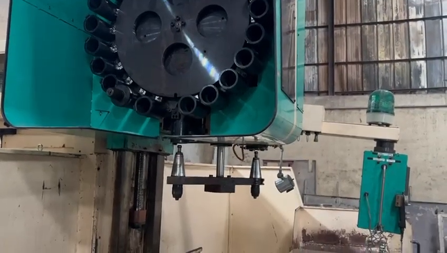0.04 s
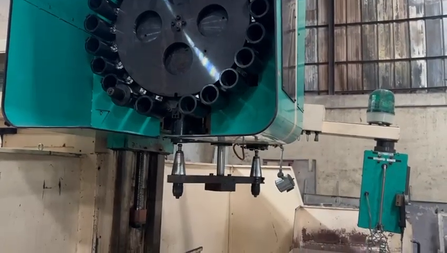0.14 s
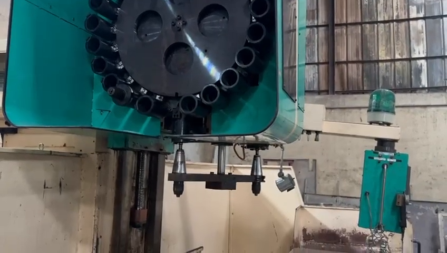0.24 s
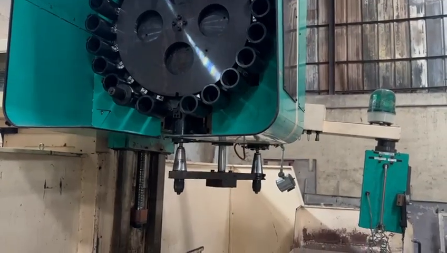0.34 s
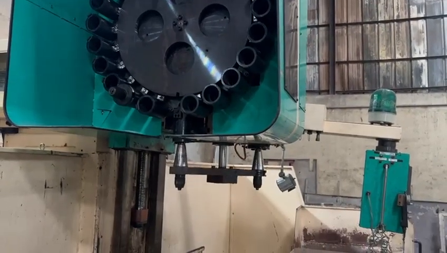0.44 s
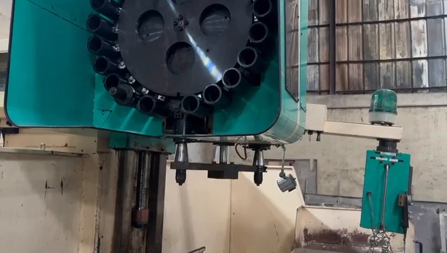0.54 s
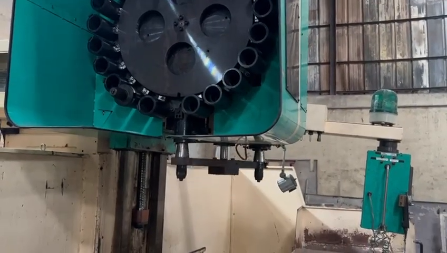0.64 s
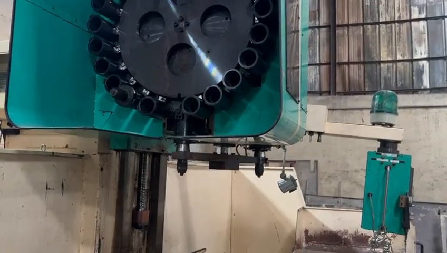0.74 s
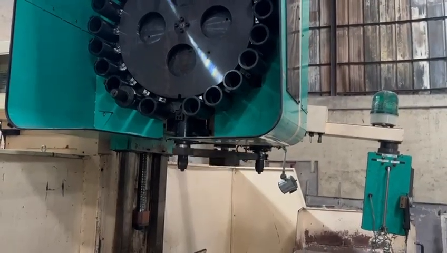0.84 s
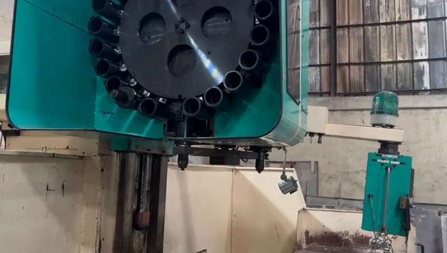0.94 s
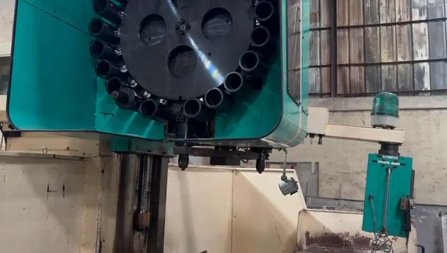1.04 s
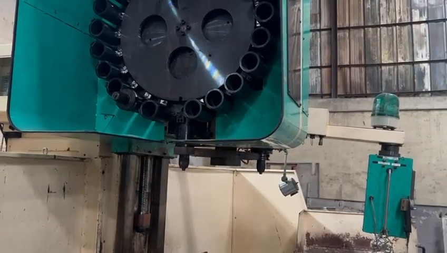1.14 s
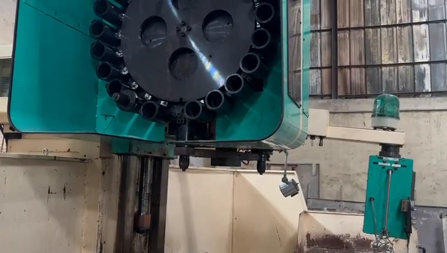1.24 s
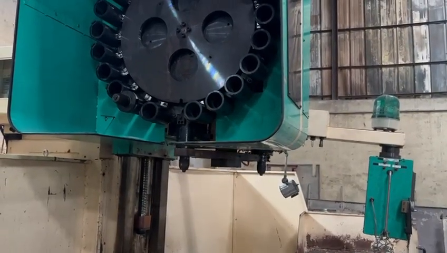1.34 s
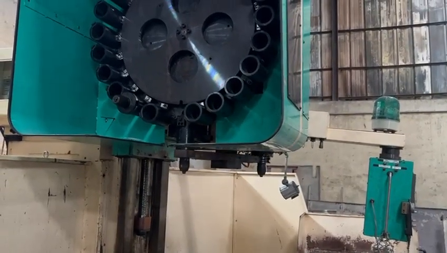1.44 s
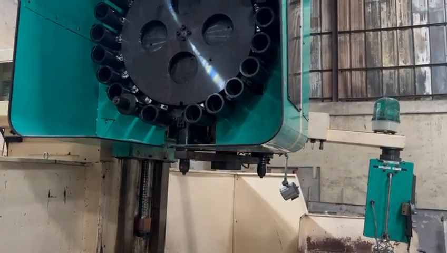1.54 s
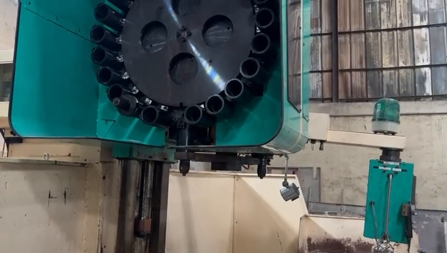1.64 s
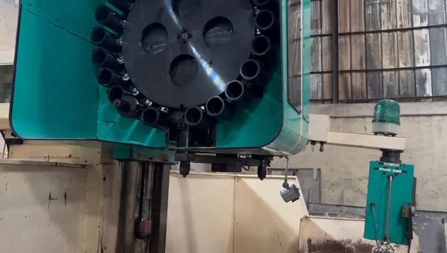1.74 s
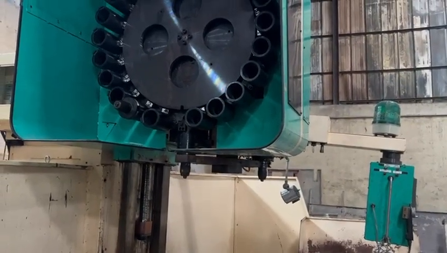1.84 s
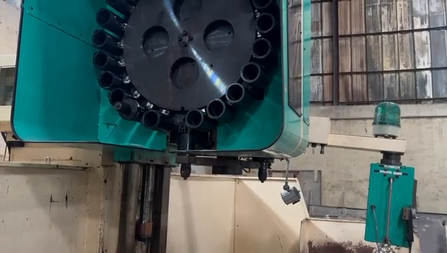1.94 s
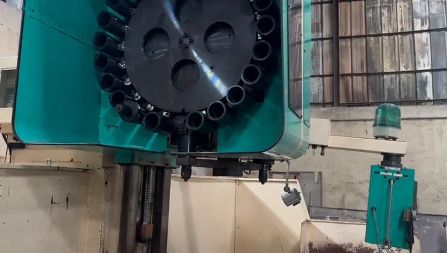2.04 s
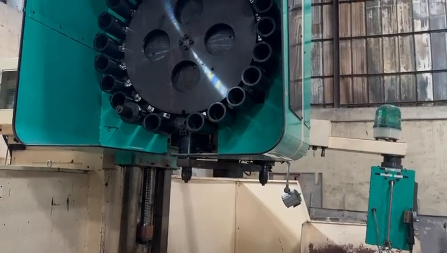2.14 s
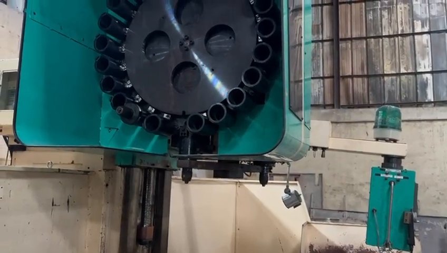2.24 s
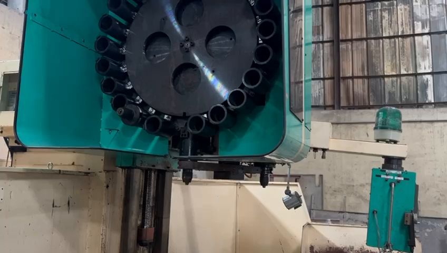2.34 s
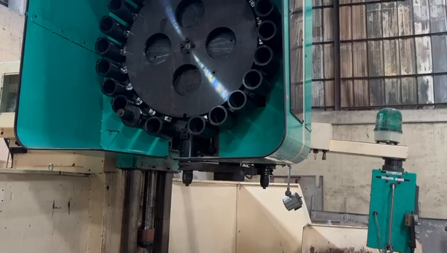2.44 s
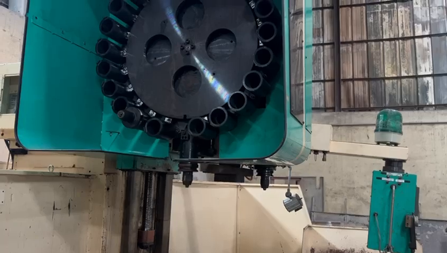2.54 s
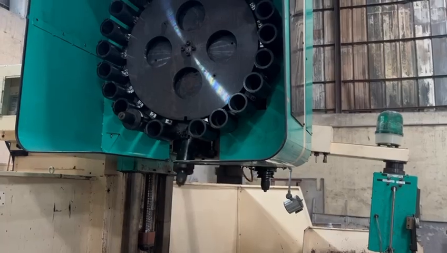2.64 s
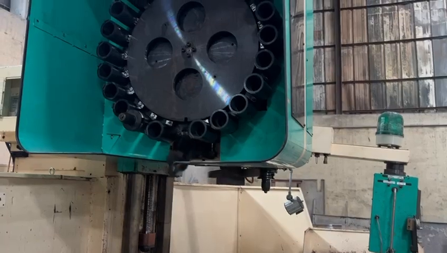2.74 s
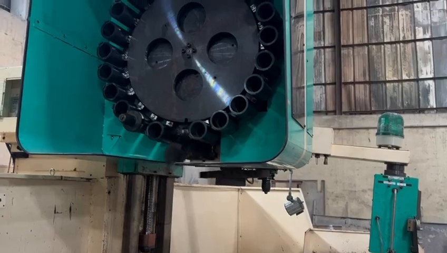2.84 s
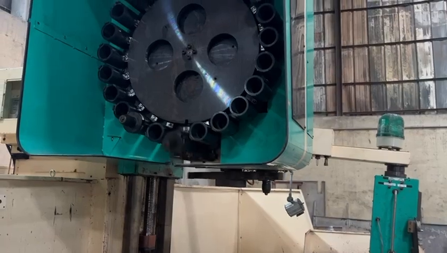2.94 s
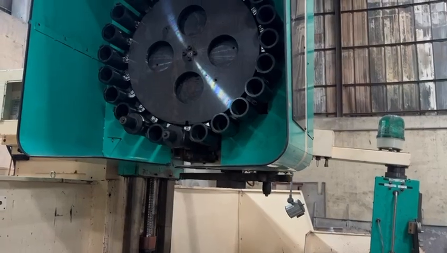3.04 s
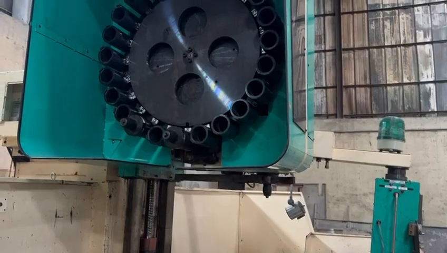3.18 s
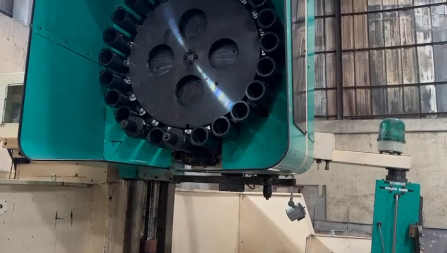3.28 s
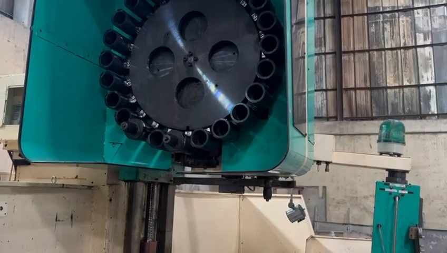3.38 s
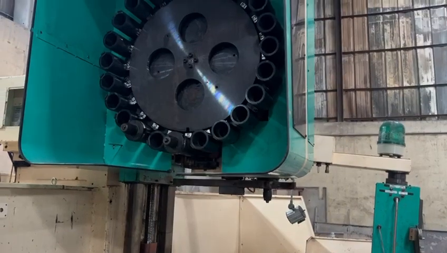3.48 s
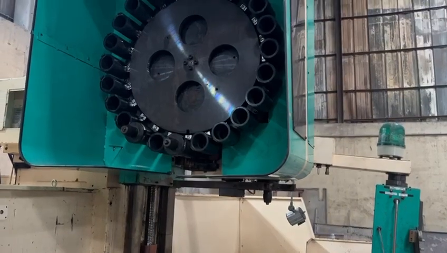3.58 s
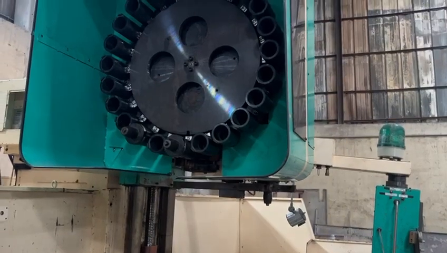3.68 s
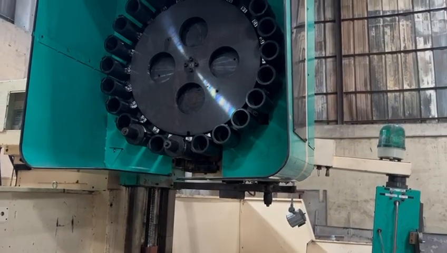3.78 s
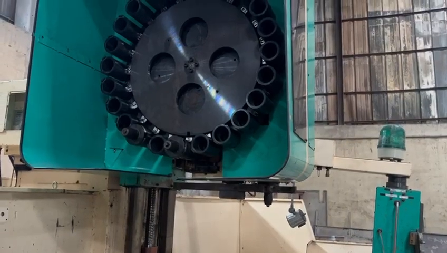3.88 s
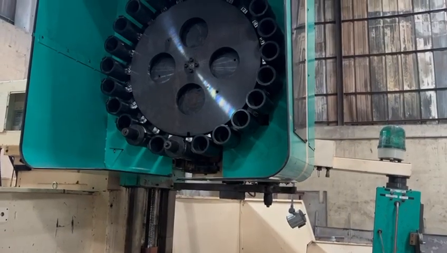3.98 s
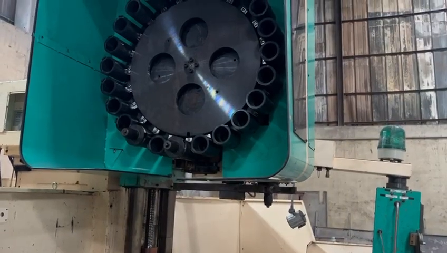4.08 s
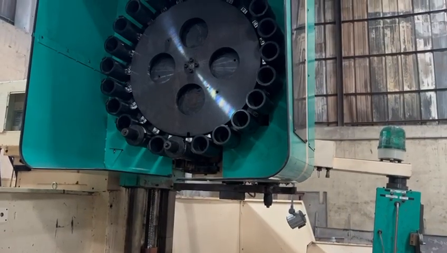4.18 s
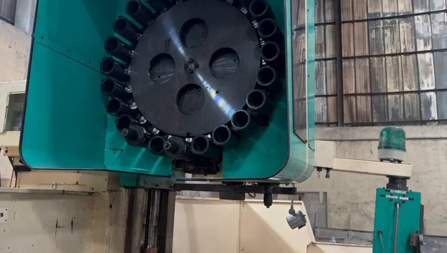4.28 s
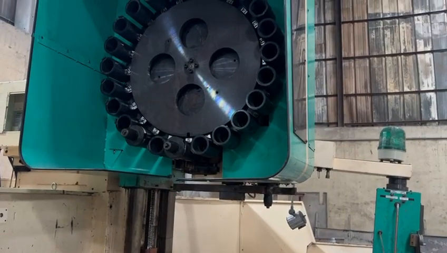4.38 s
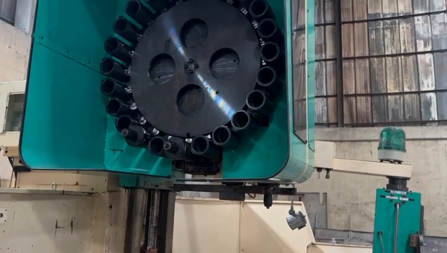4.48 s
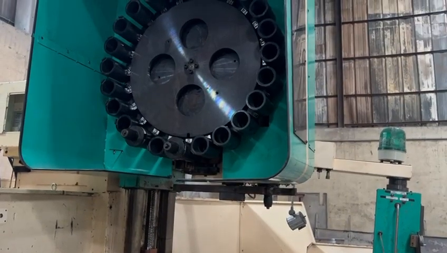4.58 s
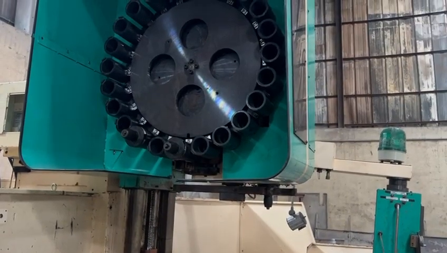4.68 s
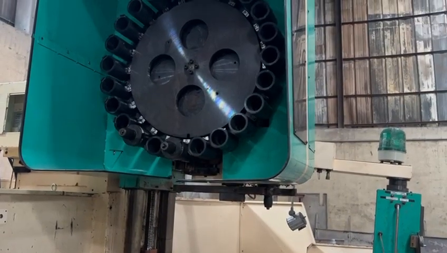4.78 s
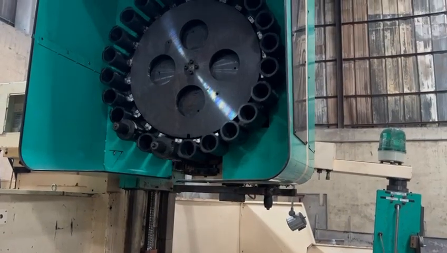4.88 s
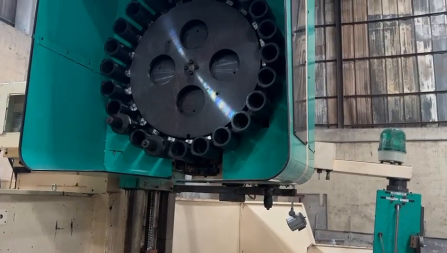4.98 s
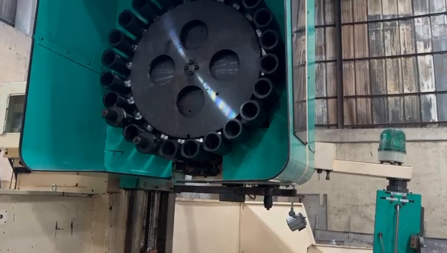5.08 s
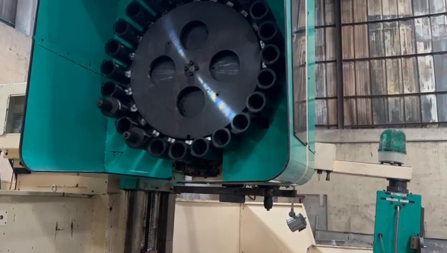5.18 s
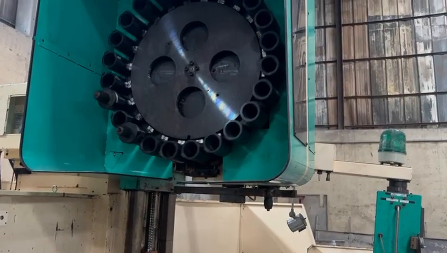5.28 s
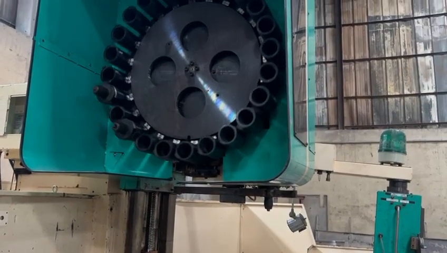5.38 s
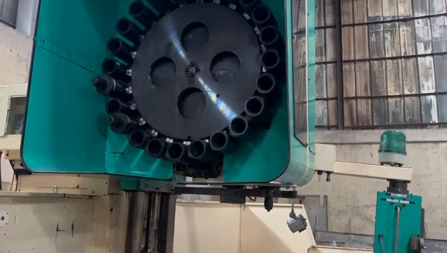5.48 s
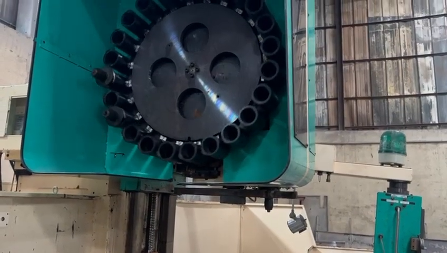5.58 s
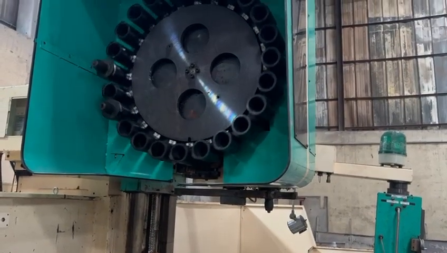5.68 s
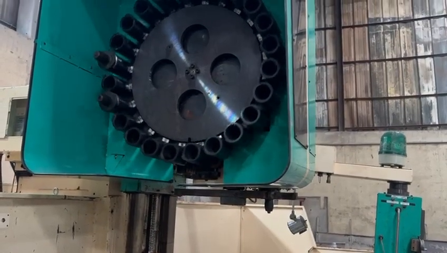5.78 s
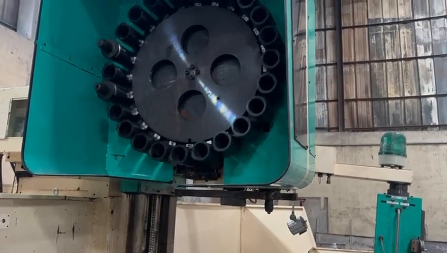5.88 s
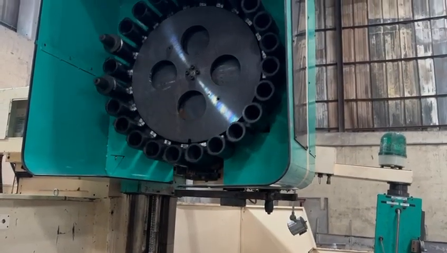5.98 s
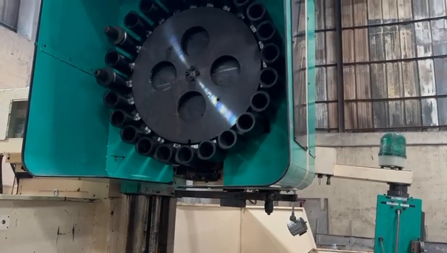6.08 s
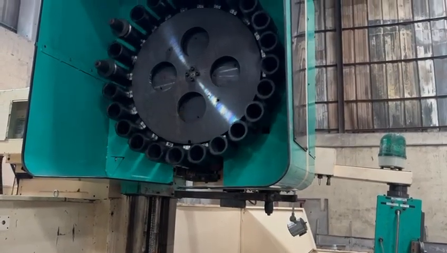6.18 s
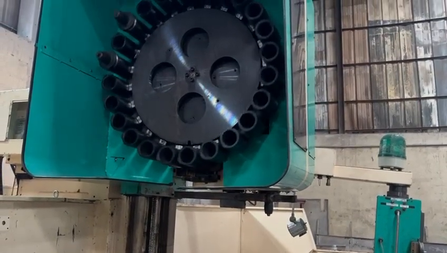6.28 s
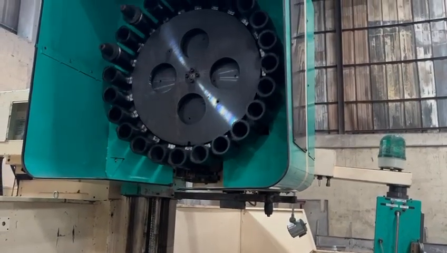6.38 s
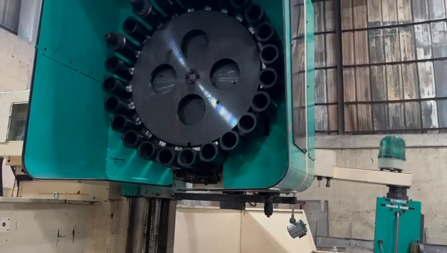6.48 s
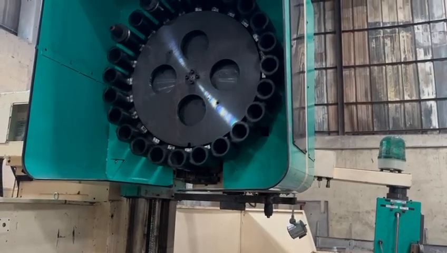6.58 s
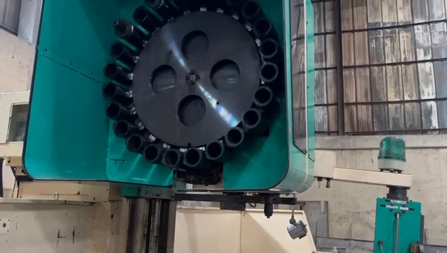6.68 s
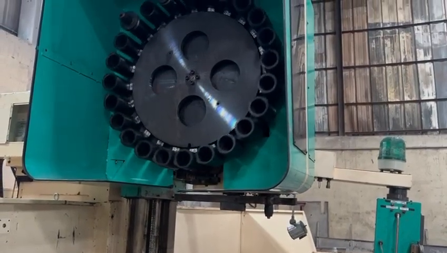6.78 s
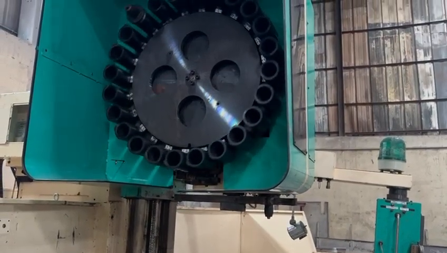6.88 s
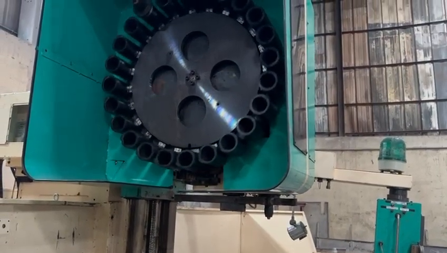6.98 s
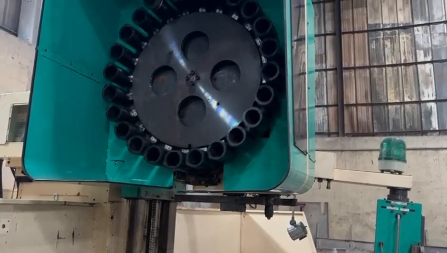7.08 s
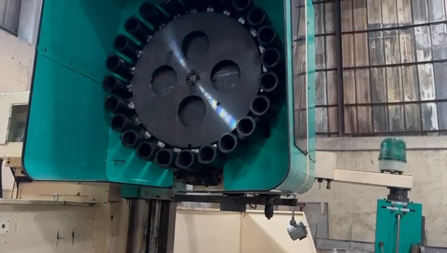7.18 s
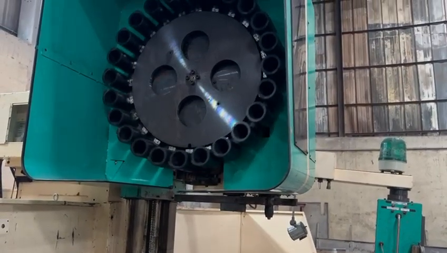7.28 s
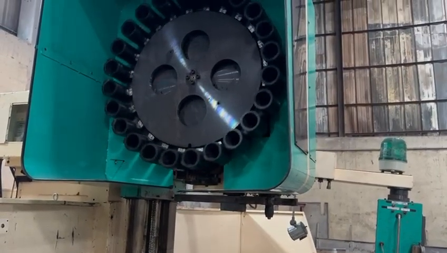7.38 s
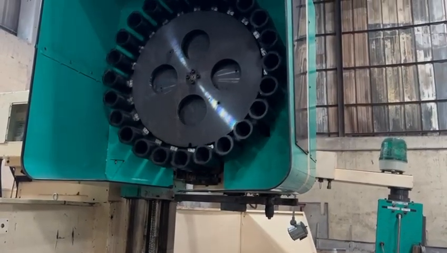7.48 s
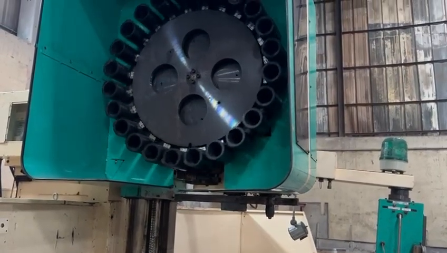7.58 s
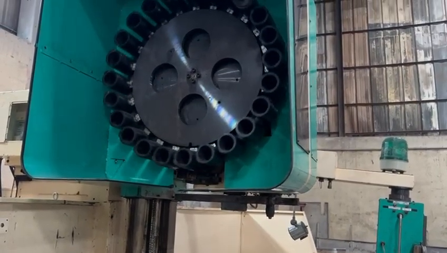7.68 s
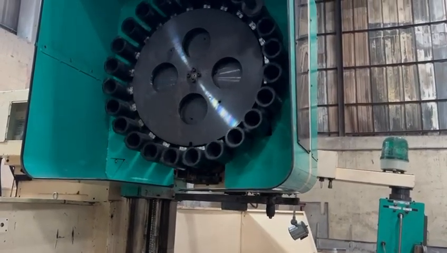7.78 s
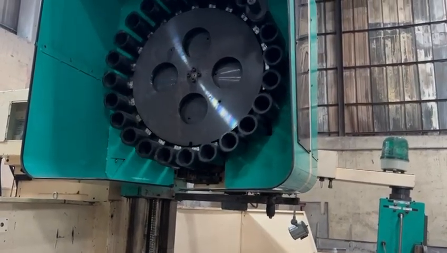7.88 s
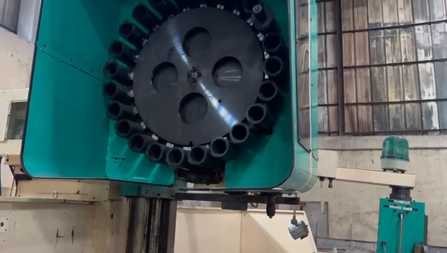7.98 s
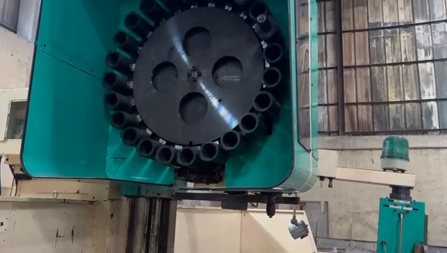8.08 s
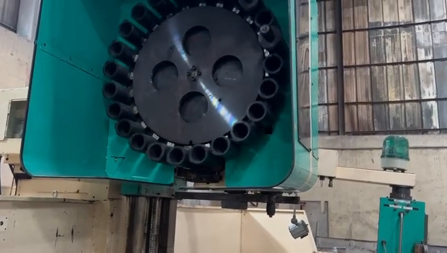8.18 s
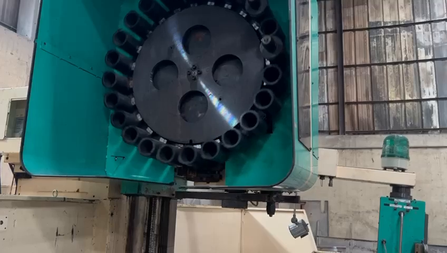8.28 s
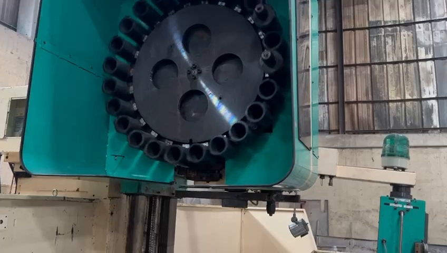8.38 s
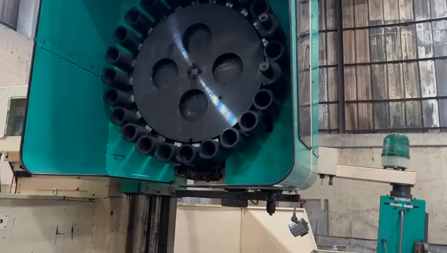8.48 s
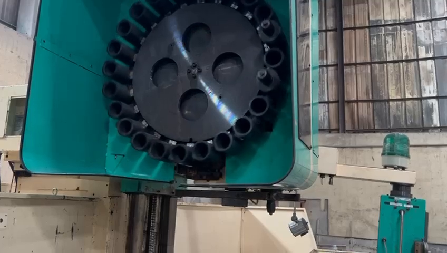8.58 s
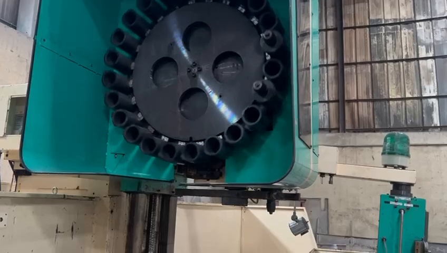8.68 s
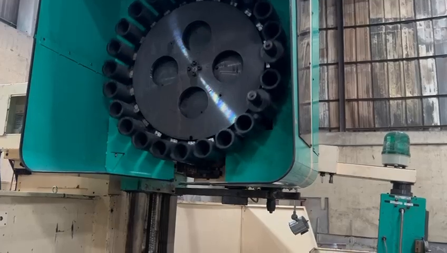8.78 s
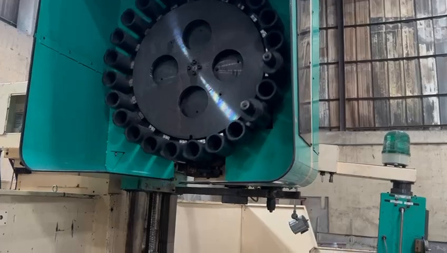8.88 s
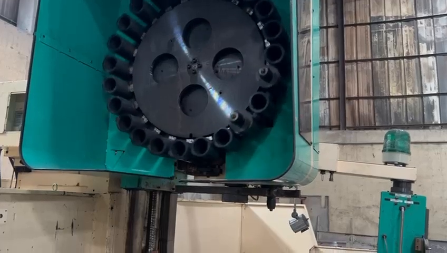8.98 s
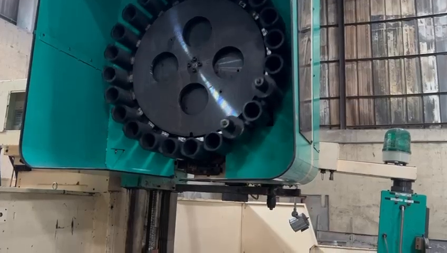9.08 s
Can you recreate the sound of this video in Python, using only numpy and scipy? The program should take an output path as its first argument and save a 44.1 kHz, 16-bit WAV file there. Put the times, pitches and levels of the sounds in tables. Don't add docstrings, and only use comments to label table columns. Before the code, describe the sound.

Heavy metal clunks, a low motor rumble and hissing air in a workshop, followed by a growling tool disc knocking about four times a second.

```python
import sys
import numpy as np
from scipy import signal
from scipy.fft import rfft, irfft, next_fast_len
from scipy.io import wavfile
from scipy.ndimage import uniform_filter1d

SR = 44100
rng = np.random.default_rng(int(sys.argv[2]) if len(sys.argv) > 2 else 0)


def wav_record(signal):
    frames = np.transpose(np.atleast_2d(signal))
    bounded = np.clip(frames, -1, 1)
    quanta = np.round(bounded * 32767).astype(np.int16)
    wavfile.write(sys.argv[1], SR, quanta)


def rack_gain(trim_db):
    fader = np.asarray(trim_db, float)
    return 10 ** (fader / 20)


N = 402631
SIZE = next_fast_len(N + SR)

# [f/Hz, level/dB]
AIR_HISS = [(3000, -13.5), (5000, -10), (6000, -7), (7500, -6.5), (9500, -8.5), (11300, -11.5),
            (12500, -12.5)]
# [f/Hz, level/dB, t60/s]
FRAME_MODES = [(102, -4.5, 0.084), (158.6, -2.5, 0.21), (197.9, -5, 0.48), (219, -3.5, 0.12),
               (269.4, 3, 0.1), (321, 7.5, 0.036)]
# [f/Hz, level/dB, t60/s]
CASING_MODES = [(449, 1, 0.083), (529, 8, 0.031), (600, -9, 0.079), (663, -0.5, 0.11), (849, 0.5, 0.052),
                (936, 2, 0.026), (1060, -5, 0.06), (1110, -24.5, .05), (1337, -11, 0.076),
                (1664, -15, 0.14), (2140, -22, 0.033)]
# [f/Hz, level/dB, t60/s]
LATCH_MODES = [(2026, -8, 0.012), (2250, -10, 0.04), (2488, -8, 0.03), (2920, -11, 0.024),
               (3410, -8.5, 0.011), (3906, -13, 0.025), (4430, -7, 0.011)]
# [f/Hz, level/dB, t60/s]
POT_MODES = [(458.5, -3.5, 0.08), (537, 2.5, 0.031), (623, 5.5, 0.022), (680, 7, 0.025), (816, 4, 0.02),
             (871.5, 2.5, 0.031), (990, 4, 0.024), (1085, -1, 0.045), (1200, -4, 0.018), (1359, -9.5, 0.05),
             (1667, -19.5, .06)]
# [f/Hz, level/dB]
STEEL_CRACK = [(710, -45), (1200, 0), (1710, -9.5), (1980, -3.5), (3080, -7), (5650, -18), (8440, -15),
               (9410, -14), (10800, -18.5), (12500, -23), (16200, -80)]
# [latch trips t/s, latch level/dB, pot drops home t/s, pot level/dB, struck spot f/Hz]
POCKET_EVENTS = [(5.0132, -25, 5.049, -17, 942), (5.2413, -23, 5.279, -18, 1090),
                 (5.4767, -22, 5.513, -10.5, 1000), (5.7084, -23, 5.746, -8, 685),
                 (5.939, -23, 5.976, -8, 720), (6.1719, -22, 6.207, -6.5, 600),
                 (6.398, -21.5, 6.436, -8.5, 646), (6.627, -22, 6.665, -9.5, 645),
                 (6.8577, -22.5, 6.894, -12, 710), (7.082, -21.5, 7.121, -12.5, 990),
                 (7.304, -22, 7.339, -8, 660), (7.5274, -21.5, 7.561, -6.5, 840),
                 (7.747, -22, 7.778, -7.5, 650), (7.964, -22, 7.996, -6.5, 627),
                 (8.1752, -22.5, 8.209, -7, 600), (8.3839, -22.5, 8.418, -17.5, 821),
                 (8.599, -22, 8.629, -15.5, 680), (8.8095, -23, 8.849, -19, 480),
                 (9.0267, -23, 9.059, -20, 552)]


def rms_one(x):
    return x / np.sqrt(np.mean(x ** 2) + 1e-20)


def at_bins(points, size):
    hz = np.maximum(np.arange(size // 2 + 1) * SR / size, 1)
    table_hz, values = np.array(points)[:, 0], np.array(points)[:, 1]
    return np.interp(np.log(hz), np.log(table_hz), values)


def response(points, size=4096):
    cepstrum = irfft(np.log(rack_gain(at_bins(points, size))))
    cepstrum[1:size // 2] *= 2
    cepstrum[size // 2 + 1:] = 0
    pulse = irfft(np.exp(rfft(cepstrum)))
    return pulse / np.sqrt(np.sum(pulse ** 2))


def drift(rate):
    r = np.exp(-80 * np.pi * rate / SR)
    white = rng.standard_normal(N // 40 + 2002)
    slow = signal.lfilter([1], [1, -2 * r, r * r], white)[2000:]
    return np.interp(np.arange(N) / 40, np.arange(len(slow)), rms_one(slow))


def noise(points, flutter_db, rate):
    white = rng.standard_normal(N + 4096)
    coloured = signal.oaconvolve(white, response(points))[4096:N + 4096]
    return rms_one(coloured * rack_gain(flutter_db * drift(rate)))


def swells(rows):
    t = np.arange(0, N + 32, 32) / SR
    s, rise, hold, fall, db = np.transpose(rows)[:, :, None]
    slope = np.minimum((t - s) / rise, (s + hold - t) / fall)
    power = rack_gain(2 * (db + 20 * np.minimum(slope, 0)))
    return np.interp(np.arange(N) / SR, t, np.sqrt(power.sum(axis=0)))


def resonate(x, hz, width_hz):
    r = np.exp(-np.pi * width_hz / SR)
    zeros = np.array([1, 0, -1]) * (1 - r * r) / 2
    return signal.lfilter(zeros, [1, -2 * r * np.cos(2 * np.pi * hz / SR), r * r], x)


def struck(modes, spread_db, crowd, spot=()):
    t = np.arange(SR // 7, dtype=np.float32) / SR
    hz, level_db, t60 = np.float32(modes).T[:, :, None]
    for spot_hz in spot:
        level_db = level_db + 5.5 * np.exp(-(np.log(hz / spot_hz) / 0.16) ** 2)
    luck = np.float32(rng.standard_normal((2, 3, len(modes), 1)))
    detune = luck[1] * np.float32([.004, crowd, crowd])[:, None, None]
    turns = 2 * np.pi * hz * (1 + detune)
    family = np.sum(np.float32(rack_gain(spread_db * luck[0])) * np.sin(turns * t), axis=0)
    decay = np.exp(-np.log(1000) * t / t60) * (1 - np.exp(-hz * t))
    ring = np.sum(rack_gain(level_db) * decay * family, axis=0)
    return ring / np.sqrt(np.sum(ring ** 2))


def blows(events, main, body, crack, rise_s, hold_s, knock, offsets_db, stretch):
    out, t, snap = np.zeros(N + SR), np.arange(SR // 6) / SR, response(crack, size=512)
    dying = -60 * (np.sqrt(t ** 2 + hold_s ** 2) - hold_s)
    for s, main_db, body_db, crack_db, t60, *spot in events:
        contacts = rng.standard_normal(len(t))
        contacts *= rack_gain(2.4 * rng.standard_normal(len(t) // 40 + 1)).repeat(40)[:len(t)]
        contacts *= np.minimum(t / rise_s, 1)
        push = contacts * rack_gain(body_db + offsets_db[1] + dying / (stretch[0] * t60))
        sound = signal.fftconvolve(push, struck(body, 1.1, 0.076))
        sound *= np.linalg.norm(push) / np.linalg.norm(sound)
        scrape = contacts * rack_gain(crack_db + offsets_db[2] + dying / (stretch[1] * t60))
        sound[:len(t)] += signal.fftconvolve(scrape, snap)[:len(t)]
        contacts[round(rise_s * SR)] += knock
        ring = signal.fftconvolve(contacts * rack_gain(dying / t60), struck(main, 0.91, 0.048, spot))
        sound += rack_gain(main_db + offsets_db[0]) * ring / np.abs(ring).max()
        at = round((s - rise_s) * SR)
        out[at:at + len(sound)] += sound
    return out[:N]


def swelling(hz, db, swell):
    t = np.arange(SR // 3) / SR
    return rack_gain(db) * t / swell * np.exp(1 - t / swell) * np.sin(2 * np.pi * hz * t)


def workshop():
    # [f/Hz, level/dB]
    shop_colour = [(20, -41), (32, -20), (65, -11.5), (130, -17.5), (440, -18), (1340, -26.5),
                   (3880, -34.5), (8900, -52.5), (12500, -58.5)]
    return rack_gain(-38.5) * noise(shop_colour, 0.9, 15.0)


def other_machines(waver):
    # [f/Hz, level/dB]
    distant_tones = [(300.3, -46.5), (421, -46.5), (895, -56)]
    t = np.arange(N) / SR
    return sum(rack_gain(db + 1.7 * drift(2.3)) * np.sin(2 * np.pi * hz * t + waver) for hz, db in distant_tones)


def mains_hum(waver):
    # [multiple of the hum, level/dB]
    hum_partials = [(1., 0), (3., -24)]
    # [top reached t/s, rise/s per 20 dB, hold/s, fall/s per 20 dB, level/dB]
    hum_swells = [(0.35, 2.5, .1, .5, -36), (0.96, 0.2, 0.11, .5, -29), (1.55, 0.3, 0.67, 0.1, -31.5),
                  (3.08, 0.12, 0.43, 0, -34), (4.1, .35, 0.62, 0.3, -31.5), (4.9, -1, 5., .3, -41)]
    t, hum_hz = np.arange(N) / SR, 99.8
    partials = sum(rack_gain(db) * np.sin(2 * np.pi * k * hum_hz * t + k * 0.15 * waver) for k, db in hum_partials)
    return rack_gain(1.2 * drift(6.) - 1.2) * swells(hum_swells) * partials


def pump(waver):
    # [multiple of the shaft tone, level/dB]
    overtones = [(2, 2.5), (3, -24), (4, -17)]
    # [fundamental level/dB, overtones level/dB]
    idle_db = [-48.5, -48.5]
    # [t/s, hold/s, level/dB]
    loads = [(0.2, .05, -43), (0.5, 0.31, -42.5), (1.15, 0.18, -37), (2.35, 0.25, -42), (3.5, 0.12, -48),
             (4.85, 5., -47)]
    # [t/s, hold/s, level/dB]
    hall_booms = [(0.05, .05, -46), (2.7, 0.95, -41.5), (4.0, 0.47, -46.5), (4.904, 5., -40)]
    # [t/s, hold/s, level/dB]
    surges = [(3.04, 0.06, -30.5), (3.215, .05, -33), (3.35, .03, -33)]
    # [t/s, length/s, share of speed]
    slips = [(0.47, 0.4502, 0.03102), (2.629, .45, 0.01999)]
    t, pump_hz = np.arange(N) / SR, 223.5
    load = swells([(s, .2, hold, 0.31, db) for s, hold, db in loads])
    boom = swells([(s, .2, hold, 0.31, db) for s, hold, db in hall_booms])
    surge = swells([(s, .05, hold, 0.038, db) for s, hold, db in surges])
    slip = sum(share * np.clip(t - s, 0, length) for s, length, share in slips)
    shaft = 2 * np.pi * pump_hz * (t - slip) + waver
    upper = sum(rack_gain(db) * np.sin(k * shaft) for k, db in overtones)
    root_gain = (rack_gain(idle_db[0]) + boom) * rack_gain(10.5 * waver)
    upper_gain = (rack_gain(idle_db[1]) + load) * rack_gain(2.2 * drift(10.0))
    upper_gain += surge * rack_gain(1.5 * drift(40.) - 1.5)
    return root_gain * np.sin(shaft) + upper_gain * upper


def arm_drive():
    # [f/Hz, level/dB]
    rumble_colour = [(24, -51), (40, 0), (98, 2.5), (200, 6.5), (242, -3), (303, 0.5), (399, -7), (436, 5),
                     (901, -19), (1150, -13), (2500, -28.5), (3250, -49), (5500, -120)]
    # [t/s, rise/s per 20 dB, hold/s, fall/s per 20 dB, level/dB]
    moves = [(0.19, .33, 0.63, .3, -34.5), (0.99, 0.27, .01, 0.18, -27), (1.2, .1, .02, 0.62, -28.5),
             (1.5, 0.28, .2, 1.2, -38.5), (2.38, 0.12, .01, .5, -33), (2.66, .4, 0.38, 1.05, -36)]
    rumble = noise(rumble_colour, 1.4, 7.9)
    rumble += rack_gain(-8) * rms_one(resonate(rumble, 193.2, 6.9))
    return swells(moves) * rumble


def air_leaks():
    # [f/Hz, level/dB]
    low_colour = [(500, -19), (1800, 0), (3000, -1), (5000, -7), (8000, -41)]
    # [t/s, rise/s per 20 dB, hold/s, fall/s per 20 dB, level/dB]
    low_leaks = [(0.2, .2, .7, .2, -53), (0.97, .05, .005, .06, -40), (1.82, 0.28, 0.22, .7, -39.5),
                 (2.42, .2, .05, .6, -49), (2.76, .15, .4, .3, -55)]
    # [t/s, rise/s per 20 dB, hold/s, fall/s per 20 dB, level/dB]
    high_leaks = [(0.148, .01, .03, .04, -43), (0.3, .3, 0.047, .1, -53.5), (0.98, 0.039, 0.033, 0.27, -38),
                  (1.2, 0.33, 0.053, .1, -46), (1.83, .7, 0.08, 0.61, -58), (2.66, .3, .29, .1, -48.5),
                  (3.08, .2, 0.14, .3, -53)]
    low, high = noise(low_colour, 1.2, 12.), noise(AIR_HISS, 1.2, 20.)
    return rack_gain(-2.5) * swells(low_leaks) * low + rack_gain(4.5) * swells(high_leaks) * high


def whistle():
    # [t/s, rise/s per 20 dB, hold/s, fall/s per 20 dB, level/dB]
    edge_tones = [
        (3.09, .015, .05, .03, -36.5),
        (3.15, .03, 0.049, 0.05, -33),
        (3.175, .02, 0.025, .03, -40),
        (3.065, .1, .02, .1, -50),
        (3.2, .1, 0.056, .07, -48),
        (3.285, .03, .025, .04, -48),
        (3.05, .05, .055, .015, -45),
        (3.19, .015, .03, .04, -46),
    ]
    # [t/s, rise/s per 20 dB, hold/s, fall/s per 20 dB, level/dB]
    drain = (3, .3, 0.13, .4, -57)
    high_row, low_row, side_row, *top_rows, last_row, early_row, late_row = edge_tones
    white = rng.standard_normal(N)
    high = resonate(resonate(white, 8980, 60), 9050, 300)
    high = rms_one(high + .05 * resonate(white, 7480, 80))
    low = resonate(resonate(white, 8597, 45), 8660, 200)
    low = rms_one(low + 0.18 * resonate(resonate(white, 8300, 150), 8300, 200))
    core = np.sin(2 * np.pi * 8595 * np.arange(N) / SR + 1.5 * drift(30.))
    beside = resonate(white, 7170, 200) + 0.3 * resonate(white, 6480, 120)
    beside = rms_one(beside + 0.8 * resonate(white, 8160, 120))
    top = rms_one(resonate(white, 11250, 120) + 0.47 * resonate(white, 10800, 150))
    last = rms_one(resonate(white, 10500, 150) + resonate(white, 10800, 150))
    tail = swells([drain])
    out = swells([early_row]) * rms_one(resonate(white, 9700, 350))
    out += swells([late_row]) * rms_one(resonate(white, 9400, 400))
    out += rack_gain(5.5) * swells([high_row]) * high
    out += rack_gain(5) * (swells([low_row]) * (.7 * low + core) + tail * low)
    out += (swells([side_row]) + rack_gain(-6) * tail) * beside
    return out + swells(top_rows) * top + swells([last_row]) * last


def snaps():
    # [t/s, peak level/dB, body level/dB, crack level/dB, rattle t60/s]
    snap_events = [(0.0368, -31, -33, -60, .04), (0.8714, -32, -29, -57, 0.045),
                   (0.9298, -25, -18, -49, 0.07), (1.1593, -33, -23, -27, 0.043),
                   (2.5114, -34, -22, -40, 0.035), (2.5544, -40, -28, -39, 0.04)]
    return blows(snap_events, LATCH_MODES, CASING_MODES, AIR_HISS, 0.0016, 0.013, 3.4,
                 offsets_db=[-5, -12, 0], stretch=[1.2, 1.1])


def clunks():
    # [t/s, peak level/dB, thud level/dB, crack level/dB, rattle t60/s]
    clunk_events = [(0.1446, -10.5, -27, -25.5, 0.085), (0.168, -17, -28, -50, 0.082),
                    (0.396, -30, -29, -58, .06), (0.912, -36, -28, -47, .054),
                    (0.953, -4.5, -14.5, -29.5, 0.052), (0.989, -16, -21, -31, .054),
                    (1.05, -25, -24, -48, 0.068), (1.119, -37, -27, -42, .093),
                    (1.236, -30, -24.5, -49, .099), (1.257, -21, -30, -46, .09),
                    (1.293, -43, -24, -44, .036), (1.359, -46, -28, -45, .084),
                    (2.339, -16.5, -27.5, -22, .12), (2.389, -20, -32, -51, .08),
                    (2.449, -23, -49, -55, .08), (2.554, -29, -31, -42, .1), (3.357, -28, -32, -56, 0.049),
                    (4.737, -15.5, -29, -32, 0.12), (4.8155, -15, -24.5, -33.5, .1)]
    spot_hz = 550
    rows = [(*row, spot_hz) for row in clunk_events]
    return blows(rows, CASING_MODES, FRAME_MODES, STEEL_CRACK, .0035, 0.022, 9,
                 offsets_db=[-4, -3, -3], stretch=[1.9, 1.5])


def magazine():
    # [f/Hz, level/dB]
    growl_colour = [(30, -35), (45, -18), (72, -5.5), (193, -3), (320, -6.5), (455, 1.5), (680, -1),
                    (900, -5.5), (1150, -3.5), (1400, -14), (1520, -32), (2200, -42), (4000, -64)]
    # [f/Hz, level/dB]
    roller_colour = [(1100, -16.5), (1500, -17), (1900, -12), (4500, -20.5), (8200, -24), (9700, -20.5),
                     (11300, -19.5), (12500, -21.5)]
    # [f/Hz, width/Hz, level/dB]
    disc_modes = [(96.7, 7.1, -4.5), (198.3, 9.7, -1.5), (221.3, 6, -1.5), (294.2, 6, -7.5),
                  (430, 19.4, 1.5), (467, 18, 2.5), (686, 7.3, 0.5), (905, 10, -3.5), (1083, 17, 0),
                  (1362, 19, -6), (1664, 15, -10.5), (2237, 22, -16.5)]
    # [t/s, growl level/dB]
    gear_load = [(4.97, -31), (5.3, -31), (7.1, -30), (7.7, -28.5), (8.45, -28), (9.13, -28.5)]
    # [t/s, rise/s per 20 dB, hold/s, fall/s per 20 dB, level/dB]
    start_jerk = (5, 0.7, 0.13, 0.23, -25.5)
    # [t/s, rise/s per 20 dB, hold/s, fall/s per 20 dB, level/dB]
    roller_runs = [(4.97, .3, 2.2, 7.9, -45.5), (9.01, 0.57, .05, .6, -47)]
    running = swells([(4.825, .03, N / SR, 1, 0)])
    load = rack_gain(np.interp(np.arange(N) / SR, *np.transpose(gear_load)))
    load += rack_gain(-7.5) * swells([start_jerk])
    teeth = (rng.random(N) < 4000 / SR) * rack_gain(2.0 * np.minimum(rng.exponential(1, N), 4))
    teeth = teeth * rng.choice([-1, 1], N)
    rings = rms_one(sum(rack_gain(db) * resonate(resonate(teeth, hz, width), hz, 8 * width) / np.sqrt(width)
                        for hz, width, db in disc_modes))
    growl = noise(growl_colour, 1.4, 25.) + rack_gain(-1.5) * rings
    ticks = (rng.random(N) < 6 / SR) * rng.exponential(1, N)
    jolts = 1 + 1.3 * signal.lfilter([1], [1, -np.exp(-1 / (0.0046 * SR))], ticks)
    return running * (load * growl + swells(roller_runs) * jolts * noise(roller_colour, 1.0, 30.))


def shudder():
    # [f/Hz, level/dB, starts after/s, swells for/s]
    stand_modes = [(65.8, -36.5, .02, .04), (97.1, -33, 0.003, .03), (160.7, -32.5, 0.002, 0.017),
                   (195, -29.5, .03, 0.046), (268, -35.5, .045, 0.029), (160, -35.5, .1, .035),
                   (465, -30, .002, 0.011)]
    # [deep shudder level/dB, upper shudder level/dB, graze level/dB]
    pocket_shudders = [(-2, -2, -46), (0, -5, -42), (1, -1.5, -45), (1.5, 1.5, -41), (0, 0, -42),
                       (0, 3, -45), (-1, 3, -38), (1, -2.5, -41), (-2, 1, -44), (0, -4, -40),
                       (-4.5, 1, -39), (-2, -1, -39), (1.5, 0, -40), (3, -0.5, -39), (0.5, -3, -36),
                       (0, 1, -46), (5, 1, -43), (1, -1, -42), (0, 1, -42)]
    # [t/s, f/Hz, level/dB, swells for/s]
    heavy_booms = [(.155, 348, -26.5, .008), (.163, 235, -22, 0.011), (.205, 200, -29, .02),
                   (.385, 88, -27, 0.016), (.46, 100, -32, .012), (.955, 190, -22, .012),
                   (.965, 99.7, -22, .02), (.978, 165, -17, 0.017), (1.03, 195, -19.5, 0.021),
                   (1.07, 190, -25, .012), (1.245, 430, -25.5, .014), (2.35, 519, -27, .012),
                   (3.31, 900, -38, .012), (7.6, 1085, -31, .04), (8.08, 1085, -30, .035),
                   (8.22, 1362, -31, .02), (5.75, 1120, -29, .025), (1.035, 98, -23.5, .02),
                   (1.112, 177.5, -21.5, 0.015), (1.17, 165, -26, .012), (1.27, 82, -26.5, 0.018),
                   (1.345, 190, -27, 0.024), (3.345, 85, -31, .015), (4.742, 534, -23, .014),
                   (4.735, 760, -27, 0.0047), (4.822, 1090, -27.5, 0.018), (4.83, 720, -25, .012),
                   (4.895, 204, -25, .012), (7.78, 1667, -36, 0.021), (8.53, 686, -27.5, .035),
                   (8.64, 1070, -25, .008), (8.61, 430, -27, .012)]
    # [f/Hz, level/dB]
    graze_colour = [(1400, -32), (1700, 0), (3000, 0), (4500, -3), (6000, 0), (8300, -6.5), (11000, -3.5),
                    (12500, -11)]
    # [t/s, rise/s per 20 dB, hold/s, fall/s per 20 dB, level/dB]
    stray_ticks = [(4.986, .002, .003, .01, -42), (6.273, .002, .002, .01, -46),
                   (7.947, .002, .003, .01, -40), (0.995, .012, .012, .03, -38)]
    # [t/s, peak level/dB]
    roller_ticks = [(4.9332, -38), (5.1013, -35), (5.2126, -31), (5.3184, -34), (5.3832, -34),
                    (5.4096, -34), (5.5912, -32), (5.6416, -36), (5.8745, -37), (6.0556, -34), (6.106, -31),
                    (6.2871, -35), (6.3689, -32), (6.5176, -36.5), (6.7456, -38), (6.8014, -36),
                    (6.8304, -30), (7.0614, -25), (7.2234, -39), (7.6274, -38), (8.9414, -43),
                    (9.0054, -33)]
    out = np.zeros(N + SR)
    luck = rng.standard_normal((len(POCKET_EVENTS), len(stand_modes), 2))
    rows = [(s, hz, db + 1.5, swell) for s, hz, db, swell in heavy_booms]
    for (s, *_), (deep_db, upper_db, _), chance in zip(POCKET_EVENTS, pocket_shudders, luck):
        for (hz, db, after, swell), (louder, sharper) in zip(stand_modes, chance):
            shift_db = deep_db if hz < 120 else upper_db
            rows.append((s + after, hz * (1 + .015 * sharper), db + shift_db + 1.5 * louder, swell))
    for s, hz, db, swell in rows:
        at = round(s * SR)
        out[at:at + SR // 3] += swelling(hz, db, swell)
    scrapes = [(row[2] - 0.008, 0.0036, .012, .03, db + 2.0)
               for row, (*_, db) in zip(POCKET_EVENTS, pocket_shudders)]
    ticks = [(s, .002, .003, 0.013, db - 11) for s, db in roller_ticks]
    return out[:N] + swells(scrapes + stray_ticks + ticks) * noise(graze_colour, 3.3, 150.)


def latches():
    # [f/Hz, level/dB]
    tick_colour = [(900, 7), (1800, 2.5), (2400, 2.5), (4500, -1), (6000, -7.5), (8300, -6.5), (9500, -2.5),
                   (11200, -16), (12400, -18.5)]
    rows = [(s, db + 7, db + 3.5, db, 0.088) for s, db, *_ in POCKET_EVENTS]
    return blows(rows, LATCH_MODES, POT_MODES, tick_colour, .0035, .024, 1.5,
                 offsets_db=[-9.5, -5.5, -5], stretch=[1.1, 1.3])


def pots():
    upper_spots = [552, 600, 662, 1120, 900, 832, 999, 859, 1000, 466, 795, 640, 1000, 888, 867, 460, 1080,
                   1070, 853]
    # [t/s, peak level/dB, crack level/dB, struck
    # spot f/Hz]
    further_knocks = [(1.252, -28, -50, 620), (2.358, -18.5, -32, 525), (2.41, -31, -45, 1150),
                      (2.505, -24.5, -48, 880), (2.544, -28, -50, 743), (2.566, -28, -45, 480),
                      (8.217, -9, -31, 870), (7.167, -25, -50, 686)]
    rows = [(s, db, -26.5, -25 + 0.43 * db, 0.04, hz, upper_hz)
            for (_, _, s, db, hz), upper_hz in zip(POCKET_EVENTS, upper_spots)]
    rows += [(s, db, -42, crack_db, .05, hz) for s, db, crack_db, hz in further_knocks]
    return blows(rows, POT_MODES, FRAME_MODES, STEEL_CRACK, 0.003006, 0.009, 8,
                 offsets_db=[1.2, -4, -5], stretch=[1.5, 2.2])


def hall(x):
    t60_s, level_db, cut_hz = 0.61, -8.5, 10400
    t = np.arange(SR) / SR
    tail = rng.standard_normal(SR) * rack_gain(-60 * t / t60_s) * np.minimum(t / 0.0082, 1)
    tail = signal.sosfilt(signal.butter(1, cut_hz, fs=SR, output="sos"), tail)
    return rack_gain(level_db) * signal.oaconvolve(x, tail / np.sqrt(np.sum(tail ** 2)))[:N]


def widen(x, share, smear_s):
    t = np.arange(SR // 8) / SR
    scatter = rfft(rng.standard_normal(len(t)) * rack_gain(-60 * t / smear_s), SIZE)
    scatter /= np.sqrt(uniform_filter1d(np.abs(scatter) ** 2, size=SIZE // 150))
    scatter -= uniform_filter1d(scatter.real, size=SIZE // 150)
    side = irfft(rfft(x, SIZE) * scatter * rack_gain(at_bins(share, SIZE)), SIZE)[:N]
    return np.array([x + side, x - side])


def scene():
    # [f/Hz, level/dB]
    far_share = [(60, -21), (200, -7.5), (700, -2.5), (1500, 1), (3500, -4.5), (6000, -3), (7200, -19),
                 (7800, -34), (12000, -39)]
    # [f/Hz, level/dB]
    near_share = [(60, -34), (200, -27), (700, -25), (1200, -8), (1700, -1.5), (2200, -9), (3200, 1.5),
                  (4500, -7), (6000, -6), (7400, -15), (8700, -16), (9200, -17), (10200, -17), (12000, -27)]
    waver = .25 * drift(3.0)
    tones = other_machines(waver) + mains_hum(waver) + pump(waver)
    hits = snaps() + clunks() + latches() + pots()
    far = workshop() + arm_drive() + air_leaks() + hall(hits)
    near = tones + whistle() + magazine() + shudder() + hits
    return widen(near, near_share, 0.04) + widen(far, far_share, 0.12)


def roll_off(x):
    return signal.sosfilt(signal.butter(12, 12970, fs=SR, output="sos"), x)


def record(dry):
    # [f/Hz, turn/half cycles]
    port_turn = [(100, 0), (500, -.08), (4000, -.1), (5500, 0), (8050, 0), (8500, .3), (9150, 1),
                 (10150, 1), (10500, 1.5), (10900, 2)]
    # [f/Hz, level/dB]
    port_tilt = [(60, -.4), (300, -.8), (1000, 0), (3000, 1.5), (4500, 1.5), (5600, 0)]
    # [f/Hz, level/dB]
    mic_band = [(20, -16), (45, -3), (60, 0), (11600, 0), (11950, -14), (12350, -55)]
    rounded = 0.81 * np.tanh(dry / 0.78)
    turn = np.exp(.5j * np.pi * at_bins(port_turn, SIZE)) * rack_gain(-at_bins(port_tilt, SIZE) / 2)
    spectrum = rfft(rounded, SIZE) * rack_gain(at_bins(mic_band, SIZE))
    ports = irfft(spectrum * np.array([1 / turn, turn]), SIZE)[:, :N]
    return roll_off(ports)


dry = scene()
out = record(dry)
wav_record(out)
```